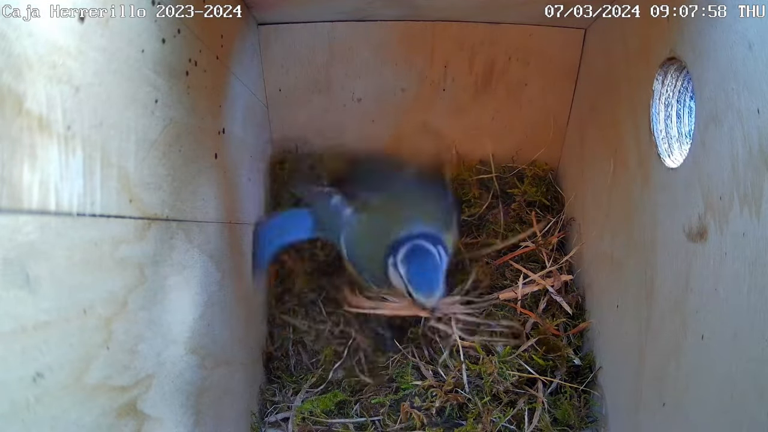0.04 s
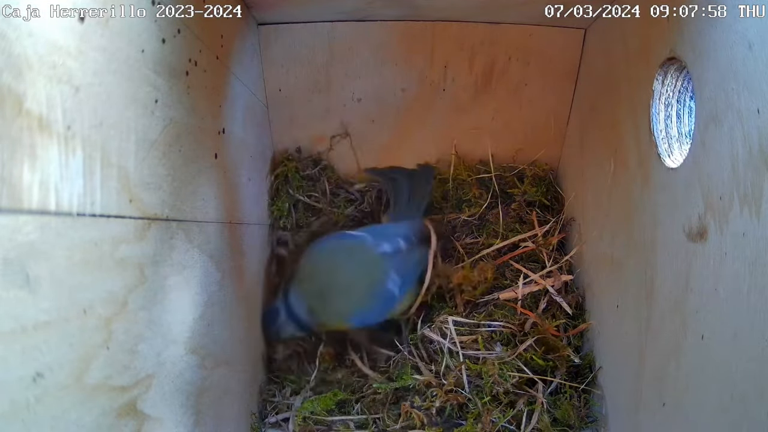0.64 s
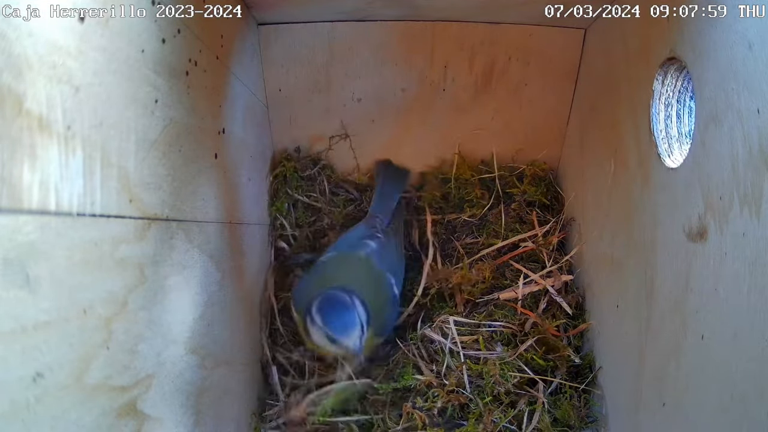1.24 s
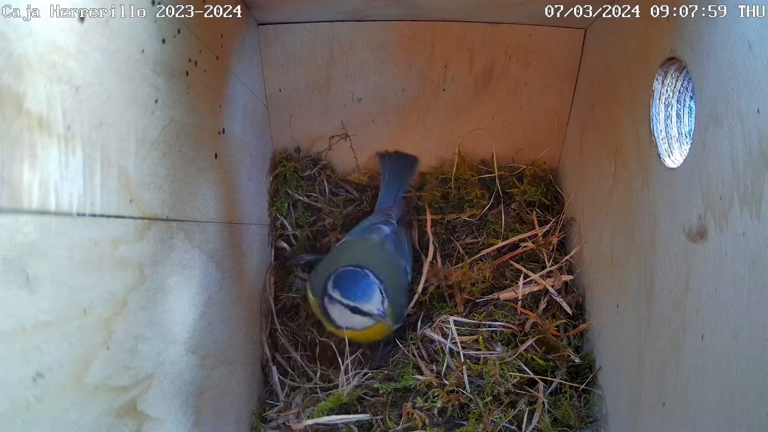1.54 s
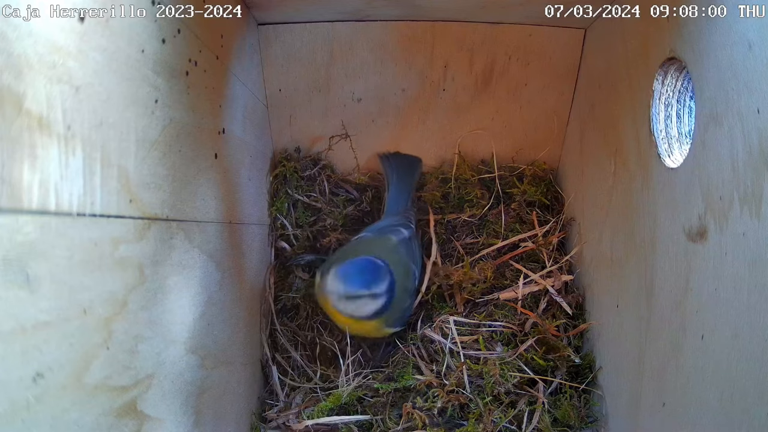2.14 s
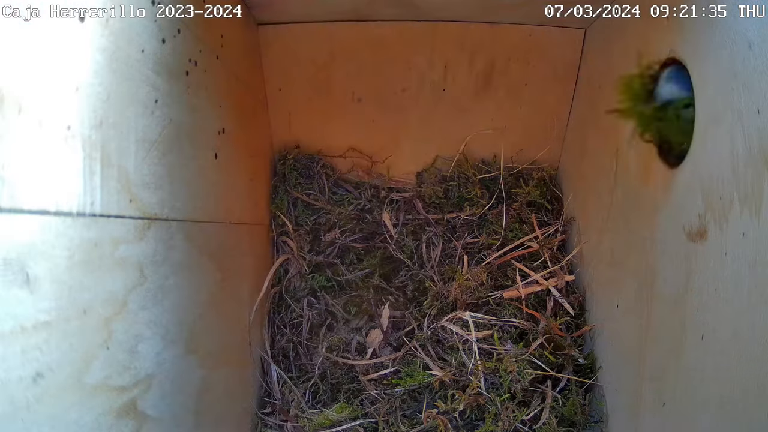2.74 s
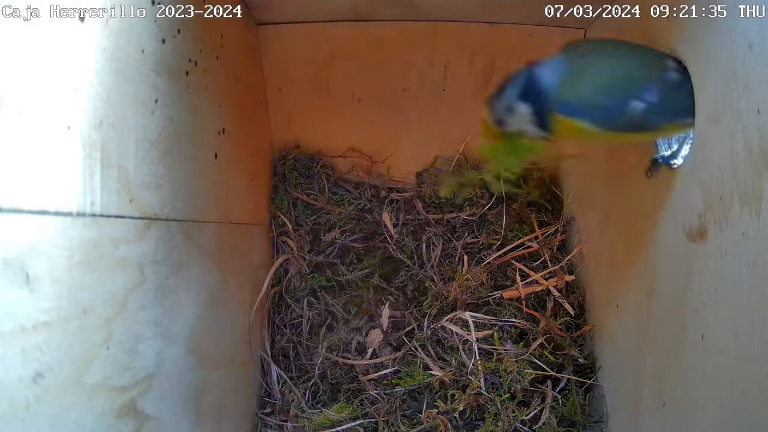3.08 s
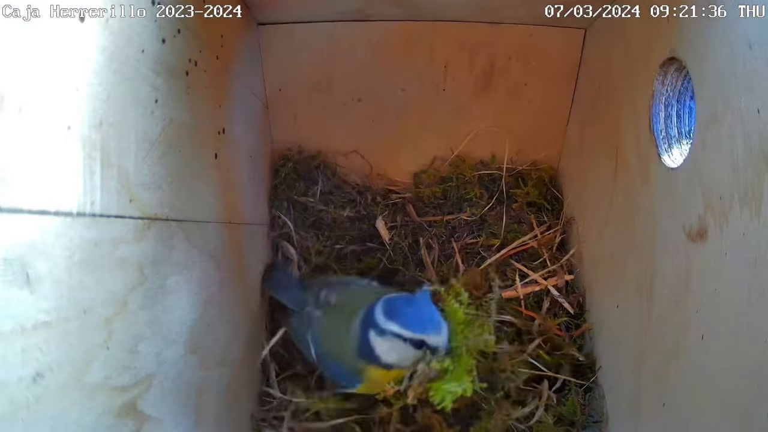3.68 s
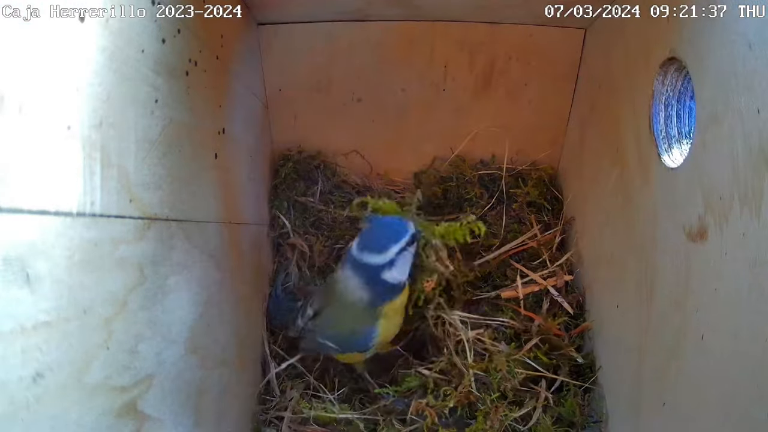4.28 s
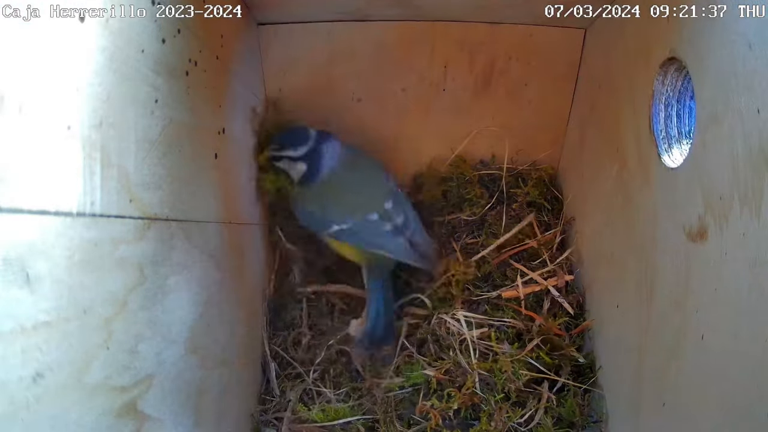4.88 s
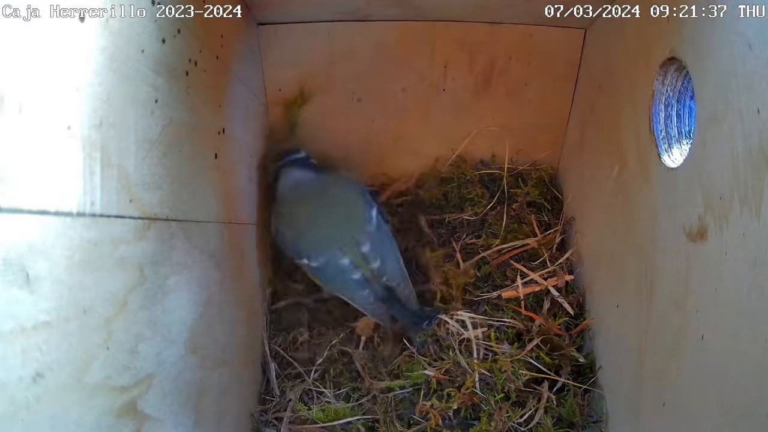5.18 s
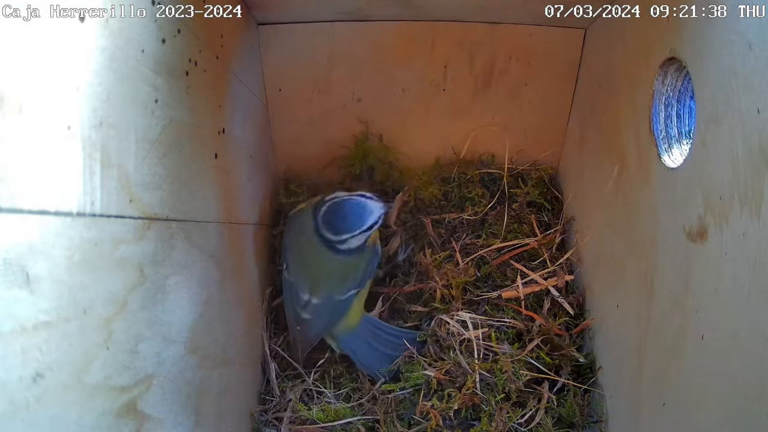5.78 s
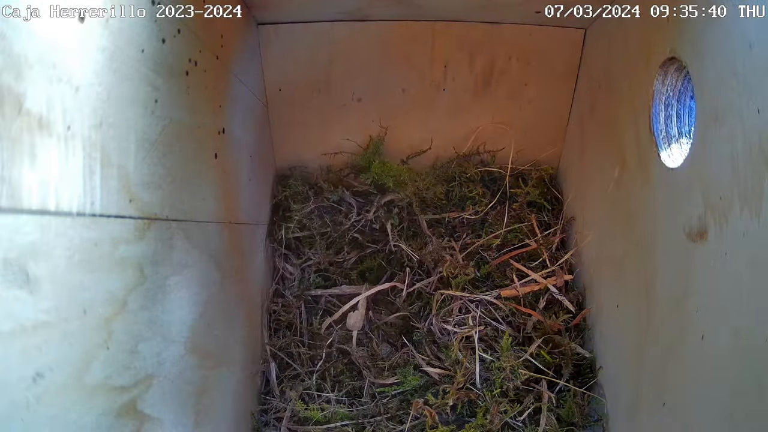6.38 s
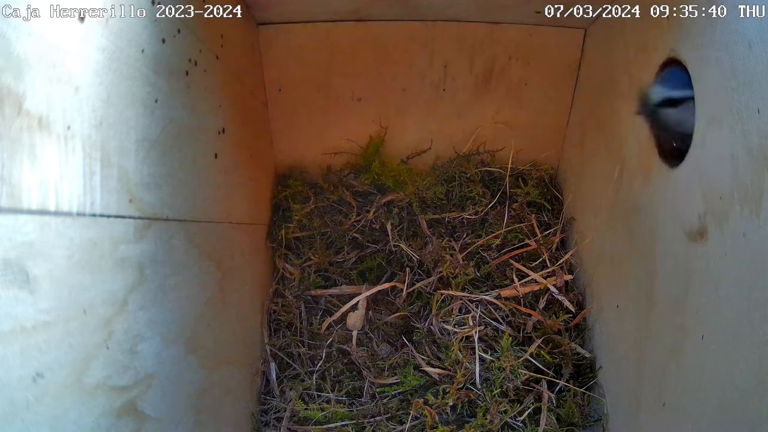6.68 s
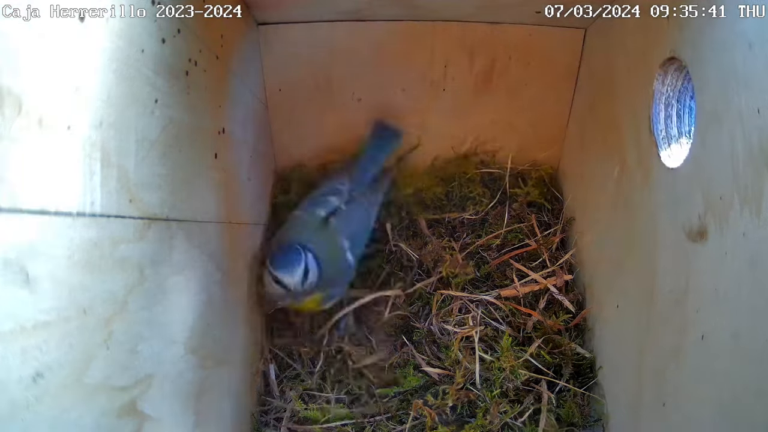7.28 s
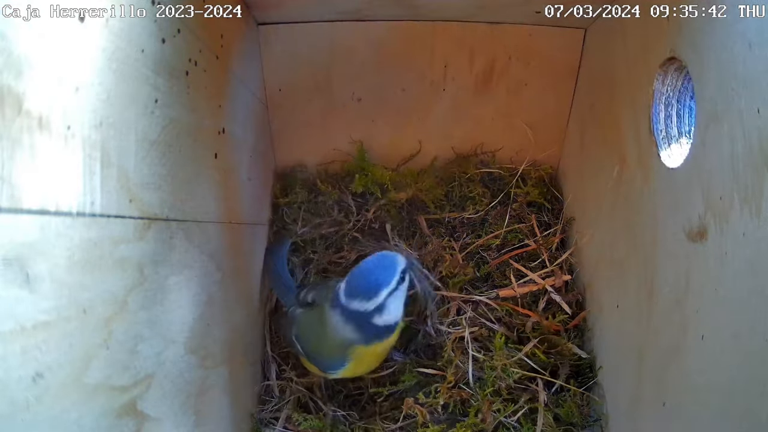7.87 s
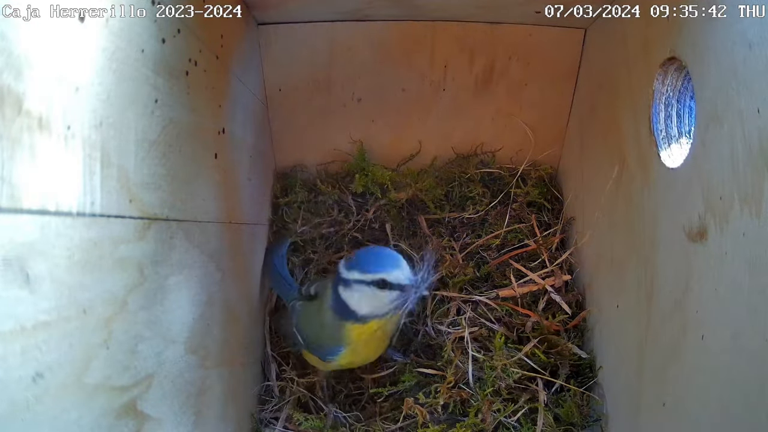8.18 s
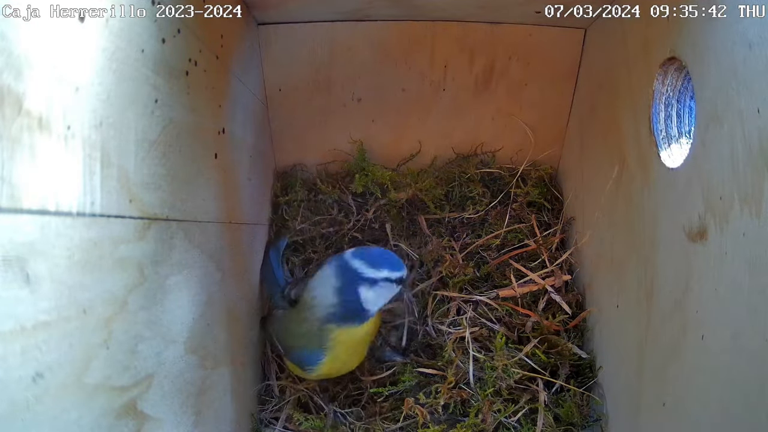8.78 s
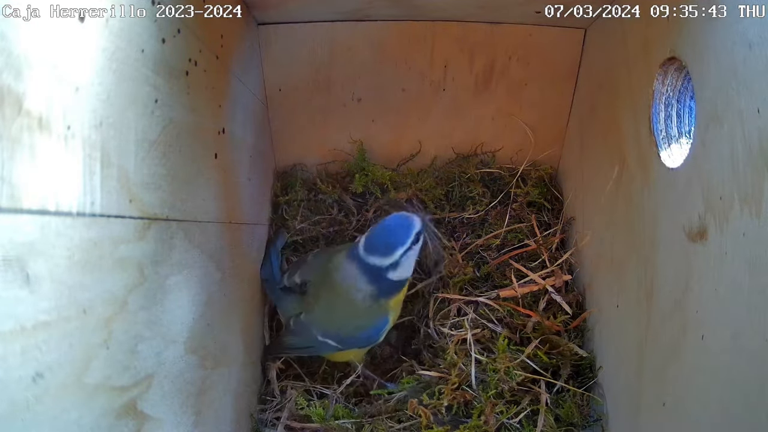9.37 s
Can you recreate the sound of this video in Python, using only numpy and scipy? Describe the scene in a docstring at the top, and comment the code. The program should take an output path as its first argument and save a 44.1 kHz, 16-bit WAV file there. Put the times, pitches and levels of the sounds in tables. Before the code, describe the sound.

A small bird shuffles through moss and dry grass inside a wooden nest box, with one sharp knock on the wall early on. Twice its claws scratch at the entrance with soft bumps and a brief flutter of wings, each time followed by more rustling, tiny cracks and scrapes. A low hum runs underneath and other birds chirp faintly outside, all heard from a close microphone in the box.

```python
"""Nest building in a wooden box.

A small bird stirs moss and dry grass, whose fibres slip and crack. Its claws scratch the entrance,
its bill and wings scrape and knock the walls, and wing beats boom in the cavity. A low drone from
outside hums through the box and other birds call faintly. A small camera inside picks it all up
at a low sample rate."""
import sys
import numpy as np
from scipy import signal
from scipy.fft import rfft, irfft, next_fast_len
from scipy.io import wavfile
from scipy.ndimage import map_coordinates

SR = 44100
rng = np.random.default_rng(int(sys.argv[2]) if len(sys.argv) > 2 else 0)


def put_to_file(sound):
    """Save the sound as 16-bit audio at rate SR, in the file named by the first command-line argument."""
    columns = np.atleast_2d(sound).T  # one column per channel
    safe = np.clip(columns, -1, 1)
    whole_steps = np.round(safe * 32767)
    wavfile.write(sys.argv[1], SR, whole_steps.astype(np.int16))


N = 420273


def amp(db):
    """Decibels to gain."""
    return 10 ** (np.asarray(db) / 20)


def unit(x):
    """Scale to rms 1."""
    return x / np.sqrt(np.mean(x ** 2) + 1e-20)


def curves(rows):
    """Per-sample curve for each column after the time."""
    times_s, *columns = np.transpose(rows)
    return [np.interp(np.arange(N) / SR, times_s, column) for column in columns]


def wobble(rate_hz, size=N):
    """Smooth random curve, rate_hz knots a second."""
    knots = rng.standard_normal(int(size * rate_hz / SR) + 4)
    return map_coordinates(knots, [np.arange(size) * rate_hz / SR])


def filtered(x, response):
    """Apply a complex frequency response."""
    size = next_fast_len(len(x) + 8192)
    hz = np.fft.rfftfreq(size, 1 / SR)
    return irfft(rfft(x, size) * response(hz), size)[:len(x)]


def coloured(x, spectrum):
    """Shape by (frequency [Hz], level [dB]) points, rolling off below the first; rms 1."""
    points_hz, db = np.transpose(spectrum)

    def response(hz):
        rolloff = np.minimum(hz / points_hz[0], 1)
        return amp(np.interp(np.log(hz + 1), np.log(points_hz), db)) * rolloff
    return unit(filtered(x, response))


def resonate(x, modes, damping=1):
    """Parallel modes (frequency [Hz], base width [Hz], gain [dB]); damping scales the widths."""
    def mode(hz, centre_hz, width_hz, db):
        loss = 1j * hz * width_hz * damping
        return amp(db) * loss / (centre_hz ** 2 - hz ** 2 + loss)
    return filtered(x, lambda hz: sum(mode(hz, *row) for row in modes))


def lossy(modes):
    """Wood damps high modes fastest: base width is at least 2.5% of frequency."""
    return [(hz, max(width_hz, 0.025 * hz), db) for hz, width_hz, db in modes]


def butter(x, hz, kind, order):
    """Causal Butterworth filter."""
    return signal.sosfilt(signal.butter(order, hz, kind, fs=SR, output="sos"), x)


def slips(rate_hz, spread_db, size):
    """Stick-slip friction: random impulses with a log-normal spread of strength."""
    impulses = (rng.random(size) < rate_hz / SR) * rng.standard_normal(size)
    return impulses * amp(spread_db * rng.standard_normal(size))


def add(track, start_s, sound):
    """Mix sound into track at start_s."""
    part = track[max(round(start_s * SR), 0):][:len(sound)]
    part += sound[:len(part)]


# Level of the low drone and airy rush in the box: (time [s], drone level [dB], air level [dB])
BOX_NOISE_LEVELS = [(0.0, -50, -59.5), (0.56, -47.5, -61), (0.9, -48.5, -58), (1.43, -48.5, -61),
                    (2.1, -46.5, -60.5), (2.76, -48, -63), (3.02, -46.5, -54), (3.4, -50.5, -62),
                    (5.02, -49, -63), (5.44, -48, -60), (6.02, -51.5, -64), (6.93, -50.5, -61),
                    (7.43, -52.5, -63.5), (9.53, -52, -65.5)]
# Low drone and airy rush: (frequency [Hz], relative density [dB])
DRONE_SPECTRUM = [(53, -75), (90, -48), (105, -36), (122, -23.5), (141, -24.5), (162, -38), (182, -24.5),
                  (215, -10), (233, -7), (254, 2), (557, -10.5), (612, -14), (820, -14.5), (1000, -29),
                  (1100, -24), (1430, -51), (2420, -120)]
AIR_SPECTRUM = [(600, -11), (1100, 0.5), (1300, 1), (1500, -3.5), (1800, 4.5), (2050, -3), (2280, -0.5),
                (2500, -14), (4000, -13.5), (5000, -18), (8000, -22)]


def background():
    """A low drone and airy rush fill the box, over a hollow tone, faint rumble and mains hum."""
    drone_db, air_db = curves(BOX_NOISE_LEVELS)
    drone_db += 0.49 * wobble(rate_hz=3.5)
    drone = amp(drone_db + 1.5) * coloured(rng.standard_normal(N), DRONE_SPECTRUM)
    air = amp(air_db + 0.5) * coloured(rng.standard_normal(N), AIR_SPECTRUM)
    hollow = amp(-67) * unit(resonate(rng.standard_normal(N), [(828, 20, 0)]))
    rumble = amp(-83.5) * coloured(rng.standard_normal(N), [(20, -1), (90, -0.5), (300, -26.5)])
    mains = amp(-85.5) * np.sin(2 * np.pi * 50 * np.arange(N) / SR)
    return drone + air + hollow + rumble + mains


# Calls: (time [s], length [s], start [Hz], middle [Hz], end [Hz], level [dB], trill depth [Hz])
FAR_CALLS = [(1.374, 0.1, 3700, 3720, 3580, -55, 290), (1.507, .025, 4040, 3730, 3360, -57, 130),
             (1.515, 0.046, 3150, 2880, 3100, -55, 40), (1.588, 0.094, 5200, 4880, 4930, -55, 30),
             (1.666, 0.041, 3500, 3420, 3400, -60.5, 20), (1.811, 0.11, 6400, 6440, 6200, -63, 600),
             (2.166, 0.078, 5750, 6100, 6400, -70, 220), (2.407, 0.073, 5700, 5930, 6100, -66, 260),
             (6.08, 0.095, 2950, 2760, 2670, -72, 22), (6.32, 0.096, 4150, 5130, 4880, -66, 60),
             (6.416, 0.018, 4920, 5400, 5940, -70, 40), (6.532, 0.11, 4500, 5160, 5100, -73.5, 90)]


def far_birds():
    """Far birds whistle gliding, trilled notes, blurred by the garden's echo."""
    trill_rate_hz, rt60_s = 140, 0.29
    calls = np.zeros(N)
    for start_s, length_s, start_hz, middle_hz, end_hz, db, depth_hz in FAR_CALLS:
        progress = np.linspace(0, 1, int(length_s * SR))
        parabola = np.polyfit([0, 0.5, 1], [start_hz, middle_hz, end_hz], 2)
        trill = np.sin(2 * np.pi * trill_rate_hz * length_s * progress)
        jitter = 0.63 * wobble(rate_hz=300, size=len(progress))
        pitch_hz = np.polyval(parabola, progress) + depth_hz * (trill + jitter)
        flutter_db = 3.9 * wobble(rate_hz=85, size=len(progress))
        envelope = amp(db + flutter_db) * np.sqrt(8 * progress * (1 - progress))
        add(calls, start_s, envelope * np.sin(2 * np.pi * np.cumsum(pitch_hz) / SR))
    t = np.arange(SR // 2) / SR
    tail = rng.standard_normal(len(t)) * amp(-60 * t / rt60_s)
    echo = signal.fftconvolve(calls, tail / np.linalg.norm(tail))[:N]
    return amp(-4.5) * calls + amp(-7) * echo


# Air modes of the box: (frequency [Hz], base width [Hz], gain [dB])
CAVITY_MODES = [(243, 14, -6.5), (290, 95, -4), (523, 64, -13), (670, 75, -15)]
# Beats and shoves at the entrance: (time [s], length [s], level [dB])
WING_BEATS = [(2.811, 0.024, -33.5), (2.836, 0.02, -42.5), (2.937, 0.045, -39.5), (3.15, 0.025, -44),
              (3.201, 0.029, -42.5), (6.714, 0.02, -39), (6.735, 0.014, -35), (6.751, 0.014, -33.5),
              (6.765, 0.012, -29.5)]


def wings():
    """Each beat pushes a puff of air into the box, which booms briefly."""
    boom_band_hz = (176, 570)
    out, t = np.zeros(N), np.arange(SR // 8) / SR
    for start_s, length_s, db in WING_BEATS:
        puff = np.sin(np.pi * np.minimum(t / length_s, 1)) * rng.standard_normal(len(t))
        cavity = resonate(puff, CAVITY_MODES, damping=0.62)
        boom = butter(cavity, boom_band_hz, "bandpass", order=4)
        push = butter(puff, 130, "lowpass", order=2)
        gain = amp(db) * np.sqrt(length_s / t[-1])
        add(out, start_s, gain * (unit(boom) + amp(-29) * unit(push)))
    return out


# Modes of the struck box: (frequency [Hz], base width [Hz], gain [dB])
BOX_MODES = [(409, 110, 0), (759, 64, -5), (953, 24, -13), (1240, 97, -7), (1440, 25, -10), (1660, 20, -17),
             (1940, 55, -1), (2240, 51, -9), (2550, 90, -19), (2850, 200, -18), (3400, 77, -24),
             (3870, 43, -31)]
# Blows on the wood: (time [s], peak [dB], contact cutoff [Hz])
BLOWS = [(0.6453, -5, 2420), (.654, -21.5, 453), (.661, -22.5, 650), (.679, -26.5, 1400),
         (2.803, -22.5, 800), (2.82, -29, 710), (2.838, -26.5, 704), (2.943, -36, 700), (6.779, -28, 750),
         (6.802, -37, 700), (7.003, -51, 700)]


def knocks():
    """A blow rings the box; bending waves carry the treble ahead of the bass."""
    out = np.zeros(N)
    ring = resonate(signal.unit_impulse(SR // 5), BOX_MODES, damping=1.25)
    dispersed = filtered(ring, lambda hz: np.exp(-1j * np.sqrt(hz / 0.932)))
    wood = butter(dispersed, 267, "highpass", order=4)
    for start_s, peak_db, contact_hz in BLOWS:
        blow = butter(wood, contact_hz, "lowpass", order=5)
        add(out, start_s, amp(peak_db) * blow / np.abs(blow).max())
    return out


# Thud, ring and grit bands of a stroke: (low [Hz], high [Hz])
STROKE_BANDS = [(210, 900), (900, 2700), (2700, 7800)]


def scratches(strokes, modes, rasp_hz, thud_db, direct_db, release_s):
    """Bursts of slips on wood: weight thuds, a blunt point rings the panel, a sharp one rasps."""
    attack_s, lead_s = 0.0021, 0.003  # contact comes just before the bite
    sharpness_db_per_octave = 57  # sharper points rasp higher
    out, t = np.zeros(N), np.arange(SR // 12) / SR
    for start_s, length_s, level_db, sharpness_db in strokes:
        pressure = (1 - np.exp(-t / attack_s)) * np.exp(-np.maximum(t - length_s, 0) / release_s)
        friction = pressure * slips(rate_hz=12000, spread_db=4.5, size=len(t))
        pitch_hz = rasp_hz * 2 ** (sharpness_db / sharpness_db_per_octave)
        force = friction + amp(-2) * resonate(friction, [(pitch_hz, 546, 0)])
        # Each spot favours other modes.
        spot_modes = [(hz, width_hz, db + 2.4 * rng.standard_normal()) for hz, width_hz, db in modes]
        panel = resonate(force, lossy(spot_modes)) + amp(direct_db) * force
        wood = butter(panel, 6560, "lowpass", order=8)
        gain = amp(level_db) * np.sqrt((length_s + 0.0087) / t[-1])
        for band_hz, band_db in zip(STROKE_BANDS, (thud_db, -sharpness_db / 2, sharpness_db / 2)):
            band = unit(butter(wood, band_hz, "bandpass", order=4))
            add(out, start_s - lead_s, gain * amp(band_db) * band)
    return out


# Entrance panel modes: (frequency [Hz], base width [Hz], gain [dB])
ENTRANCE_MODES = [(1190, 76, 0), (1940, 100, 7.5), (2350, 85, 5), (2886, 40, 3.5), (3320, 68, -6.5),
                  (3870, 21, -2), (4030, 210, -2), (4950, 21, 2), (5430, 120, -15.5), (5760, 42, -18),
                  (5700, 110, -14), (6390, 67, -4), (6700, 28, -57)]
# Claw strokes: (time [s], length [s], level [dB], sharpness as grit over ring [dB])
CLAW_STROKES = [(2.797, 0.0098, -28.5, 3), (2.818, 0.012, -38, -1), (2.839, 0.0056, -47.5, 6),
                (2.885, 0.0052, -40.5, -17.5), (2.919, 0.0062, -45, -5), (2.941, 0.0049, -40, -1.5),
                (3.006, 0.0037, -40, -7), (3.031, .01, -49.5, -13), (3.061, 0.0098, -50, 0),
                (3.082, .008, -53, 5), (3.127, .004, -45.5, 17.5), (3.148, 0.0055, -51.5, 15),
                (3.165, .008, -55, 9), (3.185, 0.0047, -51, -8), (3.206, .007, -52, 1),
                (3.221, 0.006, -51.5, -2), (6.779, 0.008, -35.5, -1.5), (6.801, 0.0084, -40.5, -1),
                (6.875, .0056, -52.5, -2.5), (6.91, .0033, -56.5, 5.5), (6.954, 0.014, -52, 4),
                (6.977, 0.016, -48.5, -2), (7.002, 0.0087, -43, 6.5), (7.052, 0.0038, -56, -4)]


def claws():
    """Claws grip the entrance hole and scratch its panel."""
    return scratches(CLAW_STROKES, ENTRANCE_MODES,
                     rasp_hz=3020, thud_db=-5.5, direct_db=-13.5, release_s=0.0047)


# Side wall modes: (frequency [Hz], base width [Hz], gain [dB])
WALL_MODES = [(1320, 55, -8), (1740, 28, -3), (1907, 93, 6), (2197, 99, 6.5), (2500, 90, -14),
              (2790, 110, -7), (3338, 56, -3), (3950, 77, -5.5), (4200, 67, -10.5), (4880, 70, -9.5),
              (5600, 75, -1.5), (5960, 180, -19), (6200, 35, -4.5)]
# Wall strokes: (time [s], length [s], level [dB], sharpness as grit over ring [dB])
WALL_STROKES = [(0.645, 0.0069, -31, -18.5), (0.659, 0.015, -50, 14), (0.684, 0.0053, -59, -6),
                (0.722, 0.028, -61.5, -18), (0.787, 0.027, -57.5, -8), (3.471, 0.01, -46.5, -18),
                (5.196, 0.0026, -38.5, -8.5), (5.212, .012, -51, -17), (5.272, .004, -54.5, -11),
                (5.476, 0.015, -51, 3), (5.491, .009, -38, -3.5), (5.564, 0.011, -48.5, -2),
                (5.606, .006, -48.5, -3), (5.635, 0.0032, -43, -4.5), (5.689, 0.0033, -50.5, -6),
                (5.705, 0.0044, -57, -3), (7.437, 0.01, -37, 7), (7.448, 0.017, -34, -4.5),
                (7.469, 0.01, -53, -13)]


def scrapes():
    """Bill, twigs and feathers drag lightly along the inner walls."""
    return scratches(WALL_STROKES, WALL_MODES,
                     rasp_hz=3680, thud_db=-23.5, direct_db=-20, release_s=0.005)


# Dry stalks giving way: (time [s], level [dB], pitch [Hz])
STALK_SNAPS = [(0.177, -42.5, 5300), (0.1956, -46.5, 5440), (1.2083, -42.5, 4280), (1.6506, -45.5, 6070),
               (1.879, -49, 5900), (3.2894, -48, 3900), (3.336, -43.5, 2850), (3.812, -41, 5560),
               (3.8248, -39, 5440), (4.0554, -47, 3900), (4.719, -51, 3830), (4.78, -55, 4340),
               (5.152, -52, 3400), (5.303, -44.5, 3320), (5.434, -48.5, 3830), (7.3097, -47.5, 3050),
               (9.2963, -53, 5750), (9.3112, -50, 4800)]


def stalks():
    """A stalk cracks in a short run of slips that ring at its own pitch."""
    width_hz, t60_s = 333, 0.12
    out, t = np.zeros(N), np.arange(SR // 12) / SR
    for start_s, db, pitch_hz in STALK_SNAPS:
        cracks = slips(rate_hz=4700, spread_db=1.5, size=len(t)) * amp(-60 * t / t60_s)
        snap = resonate(cracks, [(pitch_hz, width_hz, 0)])
        add(out, start_s, amp(db + 1) * snap / (np.abs(snap).max() + 1e-9))
    return out


# Steps, tugs and shuffles in the moss: (time [s], length [s], level [dB])
BIRD_MOVES = [(0.01, 0.12, -62), (0.162, 0.26, -59.5), (0.522, 0.17, -63.5), (0.72, .13, -56),
              (0.88, 0.17, -58.5), (1.058, 0.16, -58.5), (2.014, 0.043, -73), (2.23, 0.036, -65.5),
              (2.783, 0.52, -58.5), (3.263, 0.077, -57.5), (3.37, 0.31, -68), (3.658, 0.061, -60.5),
              (3.736, .06, -65), (3.785, 0.062, -54.5), (3.882, 0.22, -60.5), (4.12, 0.38, -69.5),
              (4.227, 0.042, -59.5), (4.604, 0.046, -61), (4.675, 0.055, -59), (4.746, .19, -60),
              (4.967, 0.29, -64), (5.07, 0.46, -60.5), (5.264, 0.038, -55.5), (5.533, 0.19, -65.5),
              (5.717, .21, -72), (6.93, 0.12, -58.5), (7.095, .12, -62), (7.278, 0.052, -59),
              (7.423, 0.05, -58), (7.563, 0.23, -66.5), (7.858, 0.077, -71), (8.692, 0.19, -78),
              (9.2, .07, -63.5), (9.271, 0.052, -57)]


def effort():
    """Rustle envelope: the moss takes up each move's load, then springs back; powers add."""
    rise_s, settle_s = 0.013, 0.035
    creep_db = -86.5  # fibres creep between moves
    t, power = np.arange(N) / SR, np.full(N, amp(creep_db) ** 2)
    for start_s, length_s, db in BIRD_MOVES:
        rise = 1 - np.exp(-np.maximum(t - start_s, 0) / rise_s)
        settle = np.exp(-np.clip((t - start_s - length_s) / settle_s, 0, 20))
        power += (amp(db) * rise * settle) ** 2
    waver_db = 1.6 * wobble(rate_hz=24)
    return np.sqrt(power) * amp(waver_db)


# Fibre rustle: (frequency [Hz], relative density [dB])
MOSS_SPECTRUM = [(500, -26), (1200, 0), (1900, -6), (2300, -8), (2600, -2), (4000, 2), (4600, 0),
                 (5400, 0.5), (6500, -3.5), (7300, -7), (8000, -19)]


def moss():
    """Thousands of fibres slip in small clumps as the bird moves; the walls ring along."""
    fibres = coloured(slips(rate_hz=5000, spread_db=4, size=N), MOSS_SPECTRUM)
    walls = unit(resonate(fibres, lossy(WALL_MODES), damping=0.4))
    envelope = effort()
    clumps_db = 1.4 * wobble(rate_hz=70)
    return envelope * amp(clumps_db) * unit(fibres + amp(-4) * walls)


# Overall level, dipping briefly and returning a little higher: (time [s], gain [dB])
LEVEL_DIP = [(6.168, -1), (6.172, -17), (6.185, -6), (6.2, 2)]


def scene():
    """Mono mix at the microphone in the box."""
    bird = amp(-3) * claws() + amp(-2) * scrapes() + moss() + stalks() + knocks() + wings()
    gain_db, = curves(LEVEL_DIP)
    return (amp(gain_db) * (bird + far_birds() + background()))[None]


def record(dry):
    """The camera samples slowly and interpolates linearly, which mirrors the treble upward."""
    rate_hz, cutoff_hz = 16000, 15750
    baseband = filtered(dry[0], lambda hz: hz < rate_hz / 2)
    leak = filtered(baseband, lambda hz: (hz / np.maximum(rate_hz - hz, rate_hz / 2)) ** 2)
    mirror = 2 * leak * np.cos(2 * np.pi * rate_hz * np.arange(N) / SR)
    return filtered(baseband + mirror, lambda hz: hz < cutoff_hz)[None]


dry = scene()
out = record(dry)
put_to_file(out)
```